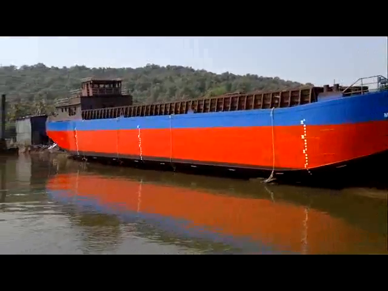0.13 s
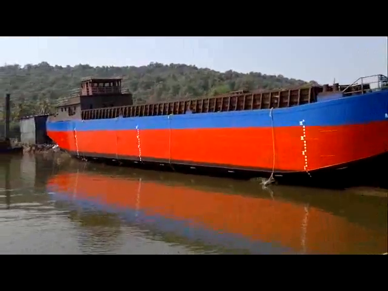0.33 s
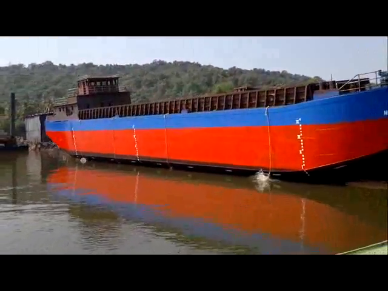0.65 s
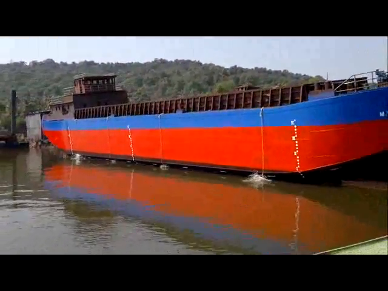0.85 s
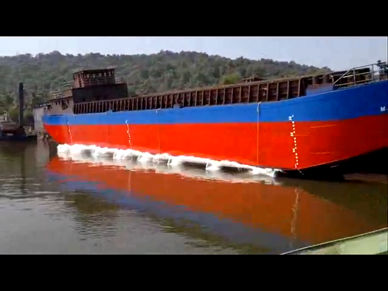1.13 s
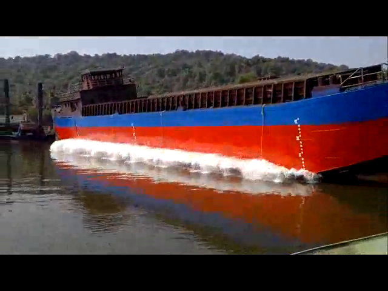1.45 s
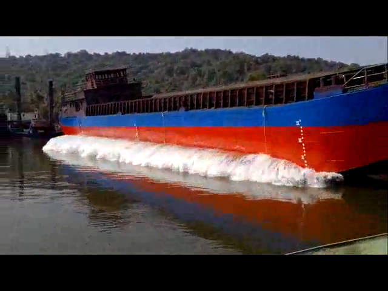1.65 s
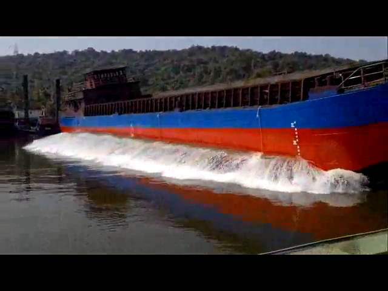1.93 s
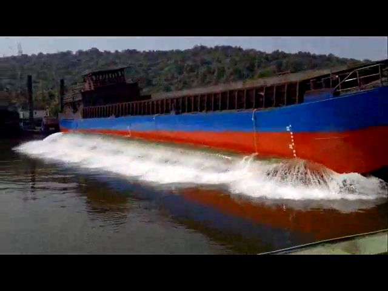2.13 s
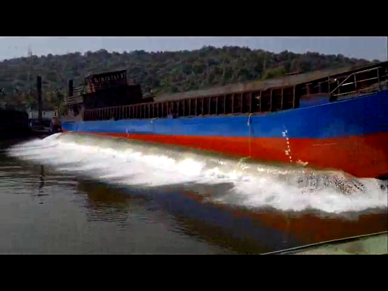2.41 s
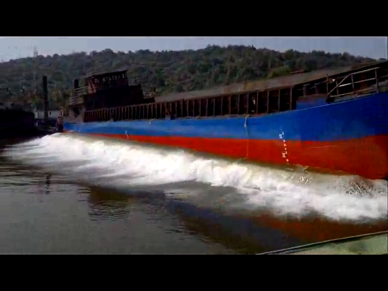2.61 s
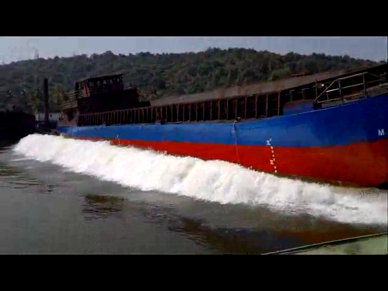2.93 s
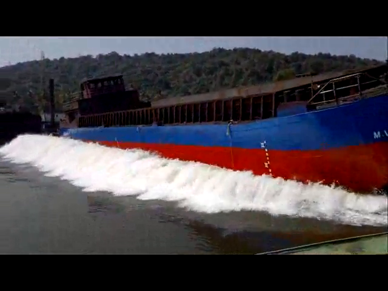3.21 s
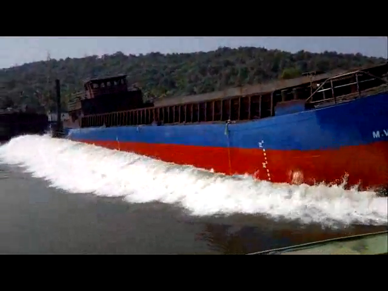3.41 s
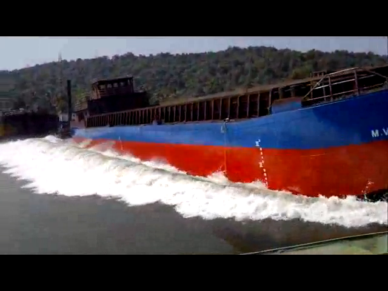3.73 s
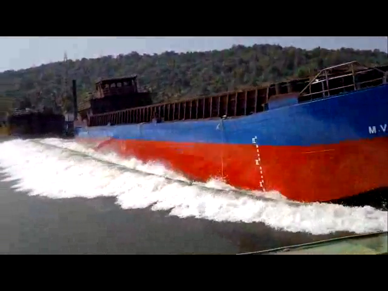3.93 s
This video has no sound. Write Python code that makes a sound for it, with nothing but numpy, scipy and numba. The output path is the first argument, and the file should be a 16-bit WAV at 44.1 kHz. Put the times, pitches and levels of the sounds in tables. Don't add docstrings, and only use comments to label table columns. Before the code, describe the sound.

Loud, dry wood snaps open abruptly over rough rumbling, thinning after half a second. A large hollow hull then hits the river with deep thuds and a watery burst. Afterwards a broad wave hisses and churns while low knocks continue irregularly. Wide, slightly rough small-camera stereo in open air, with wind rumbling on the microphone and the loudest peaks flattened.

```python
import sys
import numpy as np
from scipy import signal
from scipy.fft import rfft, irfft
from scipy.io import wavfile
from scipy.ndimage import uniform_filter1d
from numba import njit

SR = 44100
rng = np.random.default_rng(int(sys.argv[2]) if len(sys.argv) > 2 else 0)


def dump(signal):
    limited = np.clip(np.atleast_2d(signal).T, -1, 1)
    pcm = np.round(limited * 32767).astype(np.int16)
    wavfile.write(sys.argv[1], SR, pcm)


def gain_from_db(level_db):
    decades = np.asarray(level_db, float) / 20
    return 10 ** decades


N = 179333

# time_s, gust_db
GUST = [(0, -31.5), (.55, -27.5), (1.4, -20.5), (1.75, -22), (2.7, -31), (3.05, -21.5), (3.58, -22),
        (4.07, -22.5)]
# centre_hz, width_hz, level_db
WIND_MODES = [(34.3, 8.1, -7.5), (50.6, 3.6, -3.5)]
# time_s, size_db, spray_share_db
BOW_WAVE = [(0, -20, -9.5), (.14, -24.5, -4.5), (.3, -25.5, -7), (.7, -34, -4), (.85, -33.5, -2),
            (.95, -26.5, -3), (1.23, -30, 1), (1.53, -37.5, 9.5), (1.73, -28.5, 6), (1.84, -20.5, 1.5),
            (2.05, -24, 1.5), (2.33, -24.5, 3), (2.6, -27.5, 1), (3.06, -24.5, 0), (3.34, -25.5, 3),
            (3.67, -25.5, -2.5), (4.07, -26, -1.5)]
# peak_s, foam_swell_db, spray_swell_db, half_length_s
SURGES = [(0.354, 10, -1, 0.01), (0.414, 7, 4, 0.025), (0.583, 1, 4.5, 0.027), (.78, 9, -1, 0.041),
          (1.002, 8, 3, 0.022), (1.136, 7, 7.5, 0.065), (1.209, 8, 1, 0.026), (2.15, 5.5, -1.5, 0.058),
          (2.515, 5, -1, 0.077)]
# freq_hz, density_db_per_hz
WATER_COLOUR = [(210, -44.5), (350, -9.5), (488, -5.5), (630, 1.5), (996, -5), (1160, -2), (1570, -7.5),
                (3860, -1),
                (6000, -10.5), (6900, -17), (8400, -20), (10000, -32), (20000, -70)]
# centre_hz, width_hz, level_db
HULL_MODES = [(122, 120, 6), (184.8, 26, 4.5), (226.6, 55, -9), (308.5, 38, -4.5)]
# start_s, peak_db, pitch_hz, t60_s
THUDS = [(0.619, -18, 44, 0.22), (0.768, -18, 39.2, 0.29), (0.960, -4.5, 50, 0.11), (1.021, -11, 32, 0.15),
         (1.054, -9, 48, 0.13), (1.197, -14, 40.2, 0.3), (3.497, -14, 40.4, 0.11),
         (3.979, -14.5, 52.7, 0.26)]
# start_s, peak_db, pitch_hz, t60_s
KNOCKS = [(0.248, -13, 189, 0.012), (0.284, -16.5, 142, 0.06), (0.35, -11.5, 145, 0.091),
          (0.411, -14.5, 128, 0.27), (0.431, -7, 208, 0.069), (0.747, -21, 99.5, 0.037),
          (0.989, -20.5, 127, 0.026), (1.004, -4, 138, 0.1), (1.009, -7, 274, 0.05),
          (1.152, -13.5, 168, 0.046), (1.373, -9, 269, 0.17), (1.397, -6.5, 171, 0.034),
          (1.417, -9, 176, 0.13), (1.444, -9.5, 104.7, 0.14), (1.685, -12, 179, 0.084),
          (1.966, -11, 180, 0.034), (2.354, -8.5, 184, 0.13), (2.48, -16, 176, 0.06),
          (2.51, -10, 141, 0.15), (2.527, -8, 164.6, 0.1), (2.613, -11.5, 153, 0.14),
          (2.649, -12.5, 126.6, 0.11), (2.961, -8, 187, 0.094), (3.452, -11.5, 186, 0.049),
          (3.981, -11, 117.4, 0.21)]
# start_s, peak_db, treble_db
CRACKS = [(.004, -6, -2), (.009, 2, -1), (.039, -6, -1), (.067, -9, -2), (.133, -13, -5), (.1565, -1, -3),
          (.182, -12, -5), (.194, -1, -1), (.224, -10, -1), (.248, -1, -3), (.284, -12, -5),
          (.393, -16, -5), (.43, -17, -2), (.634, -20, -4), (.709, -18, 0), (.783, -17, -14),
          (1.155, -14, -8), (1.206, -13, -7), (1.407, -19, 0)]
# centre_hz, width_hz, level_db
TIMBER_MODES = [(655, 280, 10), (1160, 520, 17.5), (2070, 440, 5), (3420, 460, -14.5), (5650, 3800, -20)]
# freq_hz, likeness_0_to_1
PORT_LIKENESS = [(60, .99), (250, .96), (500, .92), (1000, .8), (2000, .6), (4000, .3), (7000, .3)]
# freq_hz, left_minus_right_db
PORT_DB = [(60, -6.5), (290, -5), (490, -3), (830, -3), (1410, 0), (2380, -5), (4400, 6.5), (8000, 2.5)]
# freq_hz, left_lead_rad
PORT_RAD = [(0, 0), (950, .5), (1290, 0), (1980, 1.7), (3360, 1.1), (3790, .1), (5250, 3.8), (6980, 7)]
# freq_hz, density_db_per_hz
FAINT_TREBLE = [(5200, -100), (5900, -76), (6500, -71), (7000, -68.5), (8600, -70), (11000, -80),
                (20000, -82)]

GRIND_DB, CUSHION_DB, WALLOW_DB = -23, -25.5, -21
ENTERS_S, FLOATS_S, CHANGE_S = 1, 2.23, 0.19
FOAM_SPRAY_SPLIT_HZ = 1450
CRACK_RISE_S, CRACK_T60_S, CRACK_T60_S_PER_DB = .002, .095, .011
MIC_LOW_HZ = 21.2
KNEE_LEVEL = 2.2


def on_axis(table):
    hz, value = np.transpose(table)
    return np.interp(np.log(np.fft.rfftfreq(N, 1 / SR) + 1), np.log(hz + 1), value)


def curves(table):
    s, *columns = np.transpose(table)
    return [np.interp(np.arange(N) / SR, s, c) for c in columns]


def unit(x):
    return x / np.sqrt(np.mean(x ** 2))


def band(x, lo_hz, hi_hz, order=2):
    return signal.sosfilt(signal.butter(order, [lo_hz, hi_hz], "bandpass", fs=SR, output="sos"), x)


def resonate(x, modes):
    return sum(gain_from_db(db) * band(x, hz - width / 2, hz + width / 2, order=1) for hz, width, db in modes)


def walk(rate_hz):
    hold = int(SR / rate_hz)
    levels = np.repeat(rng.standard_normal(N // hold + 1), hold)
    return unit(uniform_filter1d(uniform_filter1d(levels, hold), hold)[:N])


def add_at(out, start_s, sound):
    start = int(start_s * SR)
    out[start:start + len(sound)] += sound


def wind(db):
    return unit(resonate(rng.standard_normal(N), WIND_MODES) * gain_from_db(0.6 * walk(14))) * gain_from_db(db)


@njit
def grains(start, hz, cycles, size):
    out = np.zeros(N)
    for k in range(len(start)):
        length = int(cycles[k] * SR / hz[k])
        phase = 0.
        for i in range(min(3 * length, N - start[k])):
            phase += 2 * np.pi * hz[k] / SR * (1 + .1 * i / length)
            out[start[k] + i] += size[k] * np.sin(phase) * np.exp(-2 * i / length)
    return out


def wave_db():
    t = np.arange(N) / SR
    size_db, thrown_db = curves(BOW_WAVE)
    foam_db, spray_db = size_db, size_db + thrown_db
    for peak_s, foam_swell_db, spray_swell_db, half_s in SURGES:
        swell = np.clip(1 - np.abs(t - peak_s) / half_s, 0, 1)
        foam_db = foam_db + foam_swell_db * swell
        spray_db = spray_db + spray_swell_db * swell
    return foam_db, spray_db


def water(foam_db, spray_db, count=40000):
    when, pitch, big = rng.random((count, 3)).T
    start = (when * N).astype(np.int64)
    bubbles = rfft(grains(start, 400 * 18 ** pitch, 3 + 3.2 * big, gain_from_db(-2.2 * np.log(1 - big))))
    bubbles /= np.sqrt(uniform_filter1d(np.abs(bubbles) ** 2, size=400))
    roar = rfft(rng.standard_normal(N)) / np.sqrt(N)
    raw = (0.45 * bubbles + roar) * gain_from_db(on_axis(WATER_COLOUR))
    octave = np.log2(np.fft.rfftfreq(N, 1 / SR) / FOAM_SPRAY_SPLIT_HZ + 1e-9)
    foam, spray, surge = 0, 0, walk(14)
    for centre in np.arange(-3, 3, .5):
        part = irfft(raw * np.clip(1 - 2 * np.abs(octave - centre), 0, 1), N)
        part *= gain_from_db(0.32 * surge + 0.98 * walk(13))
        spray_share = np.clip(.5 + 0.75 * centre, 0, 1)
        foam = foam + (1 - spray_share) * part
        spray = spray + spray_share * part
    return unit(foam) * gain_from_db(foam_db + 0.53) + unit(spray) * gain_from_db(spray_db + 1.33)


def keel_db():
    t = np.arange(N) / SR
    enter, afloat = (np.clip((t - s) / CHANGE_S + .5, 0, 1) for s in (ENTERS_S, FLOATS_S))
    return GRIND_DB + enter * (CUSHION_DB - GRIND_DB) + afloat * (WALLOW_DB - CUSHION_DB)


def hull(db):
    jolts = rng.standard_normal(N) * gain_from_db(2.17 * walk(45))
    return unit(band(resonate(jolts, HULL_MODES), 75, 353)) * gain_from_db(db + 1.93)


def blows(table, click_db):
    out, t = np.zeros(N + SR), np.arange(SR // 4) / SR
    for start_s, db, hz, t60_s in table:
        rise = np.minimum(t * hz * 5.8, 1)
        ring = -np.sin(2 * np.pi * hz * t) * gain_from_db(-60 * t / t60_s) * rise
        click = band(rng.standard_normal(len(t)), 300, 970) * gain_from_db(click_db - 60 * t / 0.039)
        add_at(out, start_s, gain_from_db(db) * (ring / ring.max() + click))
    return out[:N]


def cracks():
    out, t = np.zeros(N + SR), np.arange(SR // 4) / SR
    for start_s, db, treble_db in CRACKS:
        fibres = rng.standard_normal(len(t))
        ring = resonate(fibres, TIMBER_MODES)
        bright = gain_from_db(treble_db + 10) * band(ring, 2000, 5000, order=4)
        ring = unit(band(ring, 350, 2200) + bright)
        snap = gain_from_db(treble_db - 7 - 60 * t / 0.14) * band(fibres, 5500, 9500)
        t60_s = max(CRACK_T60_S + CRACK_T60_S_PER_DB * treble_db, .03)
        shape = np.minimum(t / CRACK_RISE_S, 1) * gain_from_db(-60 * t / t60_s)
        add_at(out, start_s, gain_from_db(db - 6.5) * (ring + snap) * shape)
    return out[:N]


def launch():
    steel = hull(keel_db()) + blows(THUDS, click_db=-18.5) + blows(KNOCKS, click_db=-13.5)
    return wind(curves(GUST)[0] + 1.8) + steel + cracks() + water(*wave_db())


def ports(x, scattered):
    alike = np.clip(on_axis(PORT_LIKENESS), 0, .999)
    tilt = gain_from_db(on_axis(PORT_DB) / 2) * np.exp(.5j * on_axis(PORT_RAD))
    share = np.sqrt((1 - alike) / (1 + alike))
    direct, side = rfft(x), share * rfft(scattered)
    whole = np.sqrt(np.abs(tilt + 1 / tilt) ** 2 + np.abs(share * (tilt - 1 / tilt)) ** 2) / 2
    return irfft(np.array([tilt * (direct + side), (direct - side) / tilt]) / whole, N)


def scene():
    return ports(launch(), launch())


def drop_faint_treble(x):
    frames = dict(fs=SR, window="cosine", nperseg=1024, scaling="psd")
    hz, _, lines = signal.stft(x, **frames)
    spray_lines = lines[:, (hz > 3000) & (hz < 5000)]
    spray = np.mean(np.abs(spray_lines) ** 2, axis=(0, 1)) / gain_from_db(2 * -62)
    floor_db = np.interp(hz, *np.transpose(FAINT_TREBLE), left=-200)
    least = gain_from_db(floor_db)[:, None] * spray ** .35
    return signal.istft(lines * (np.abs(lines) > least), **frames)[1][:, :N]


def band_limit(x):
    return signal.sosfilt(signal.butter(12, 20000, fs=SR, output="sos"), x)


def record(dry):
    heard = signal.sosfilt(signal.butter(2, MIC_LOW_HZ, "highpass", fs=SR, output="sos"), dry)
    rounded = KNEE_LEVEL * np.tanh(heard / KNEE_LEVEL)
    mix = np.clip(drop_faint_treble(rounded), -.99, .99)
    return band_limit(mix)


dry = scene()
out = record(dry)
dump(out)
```